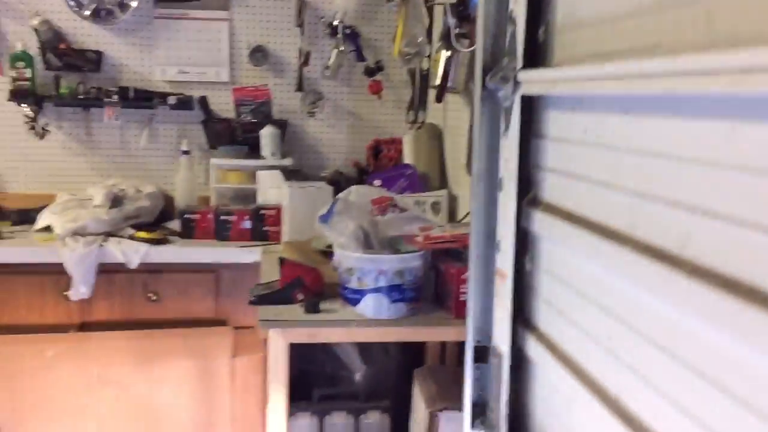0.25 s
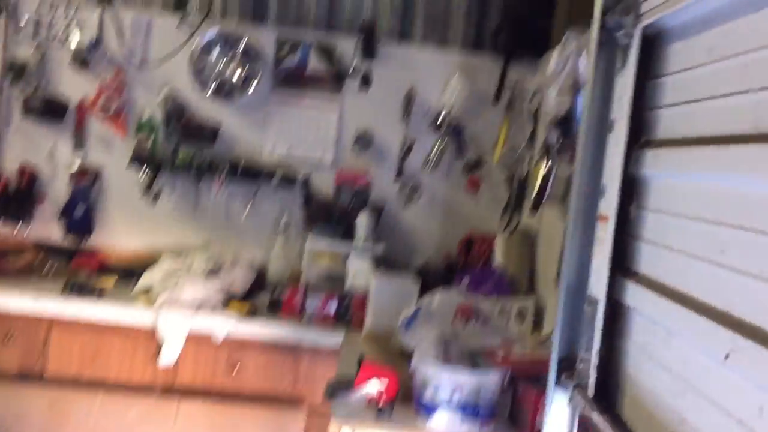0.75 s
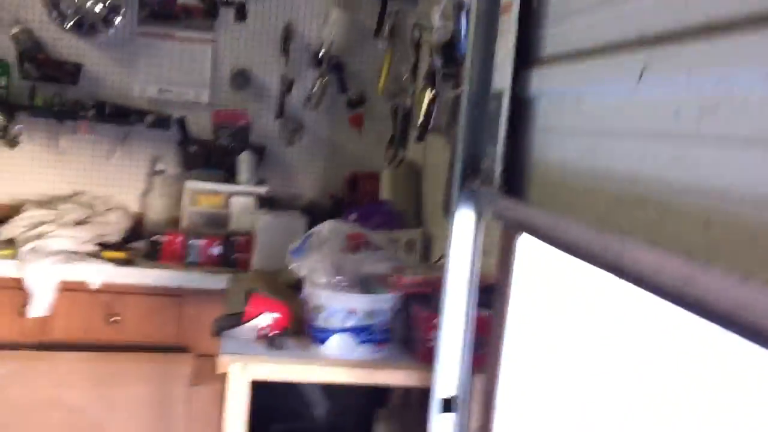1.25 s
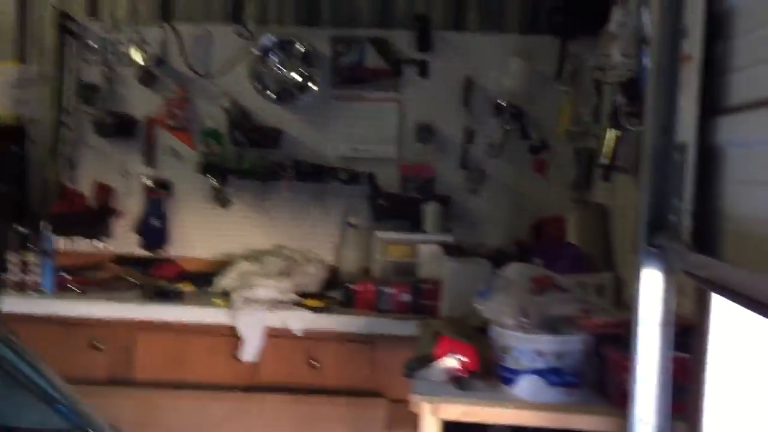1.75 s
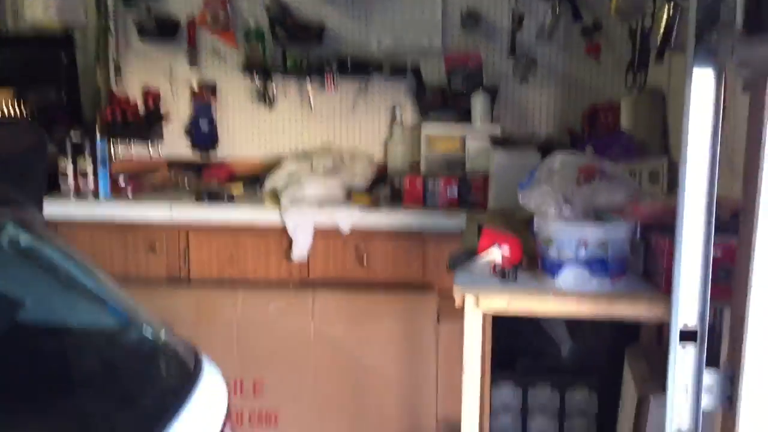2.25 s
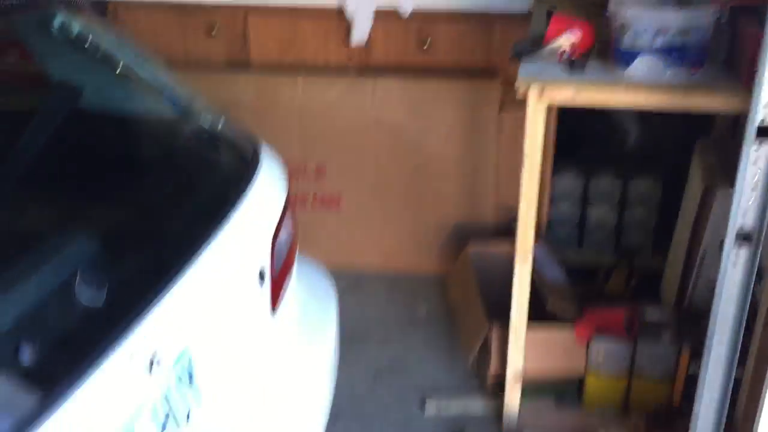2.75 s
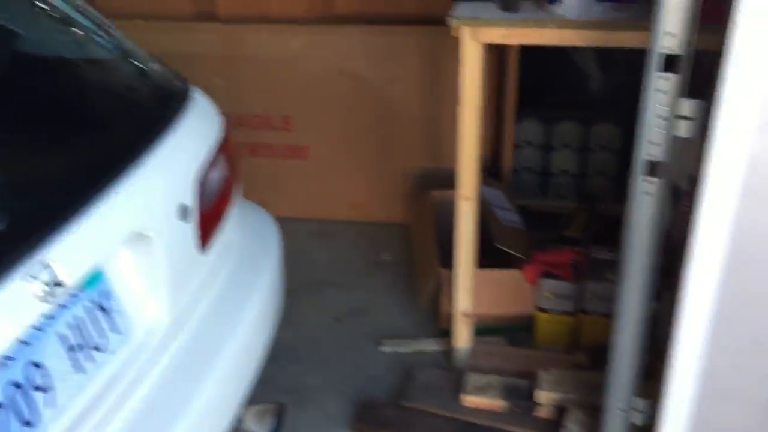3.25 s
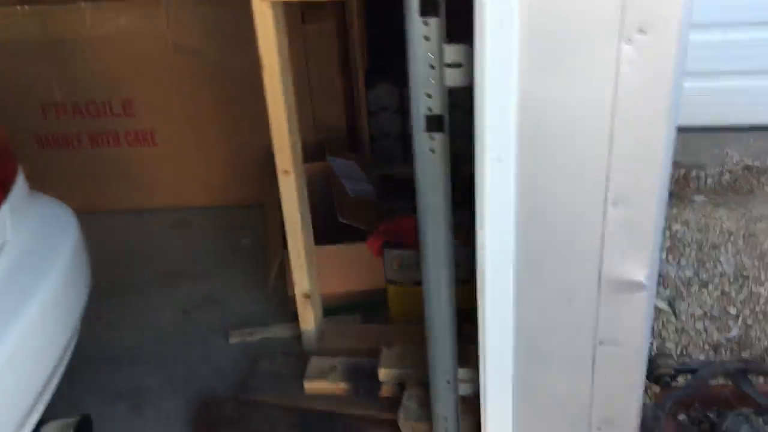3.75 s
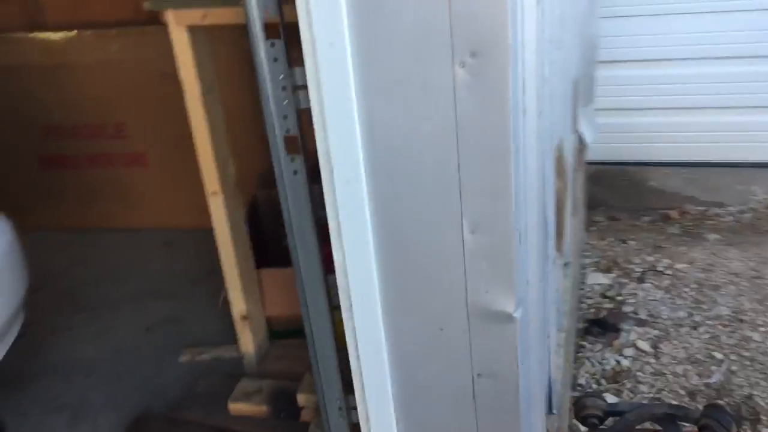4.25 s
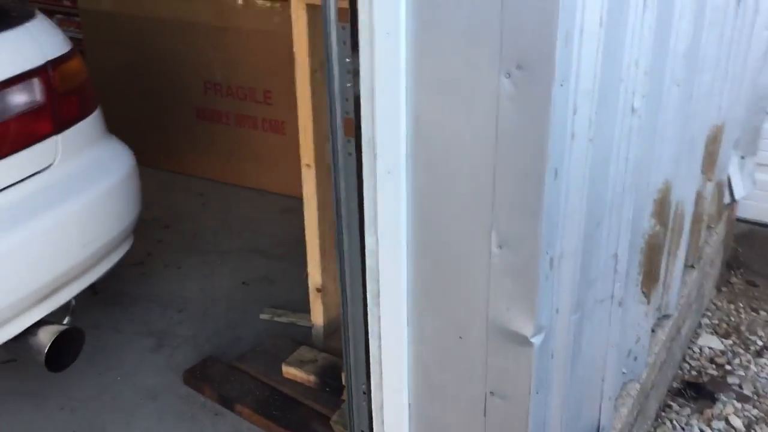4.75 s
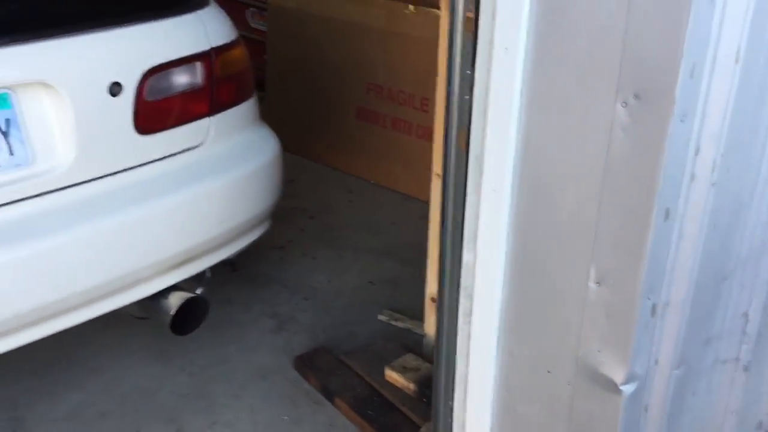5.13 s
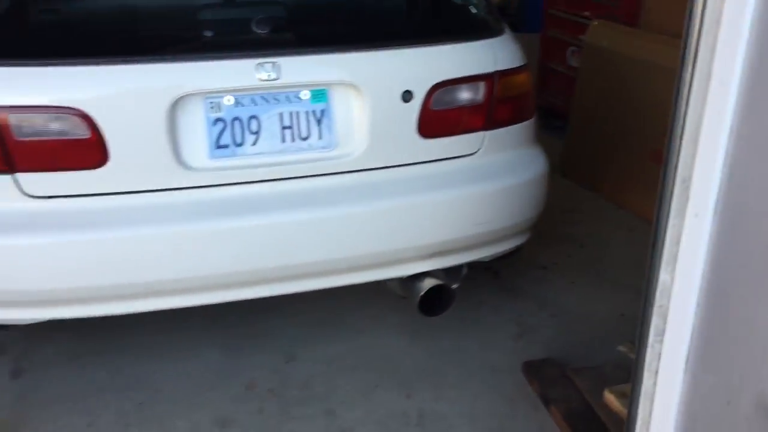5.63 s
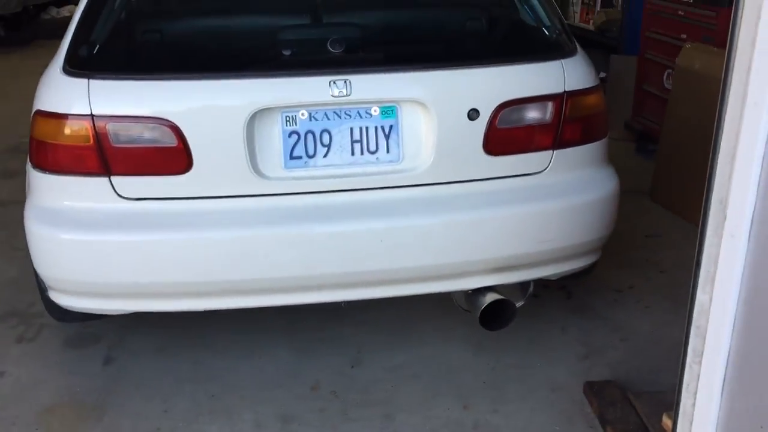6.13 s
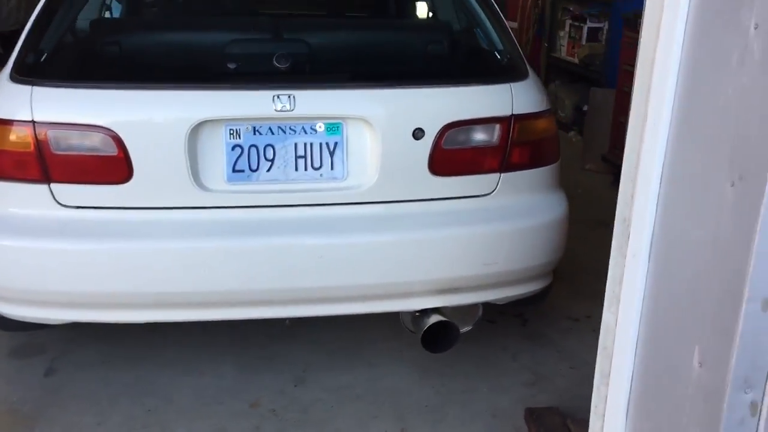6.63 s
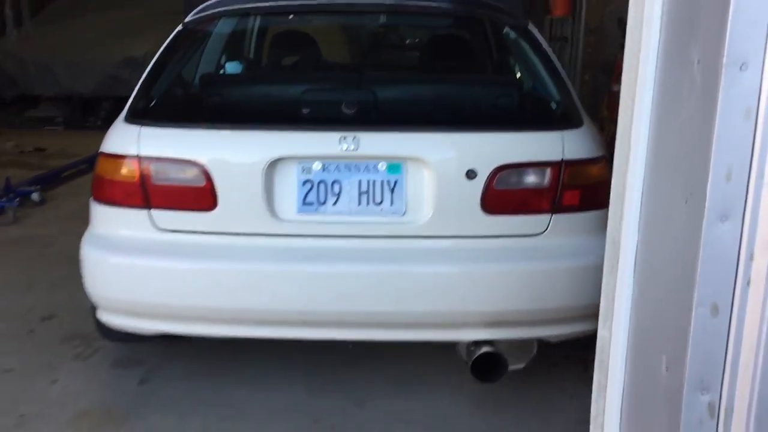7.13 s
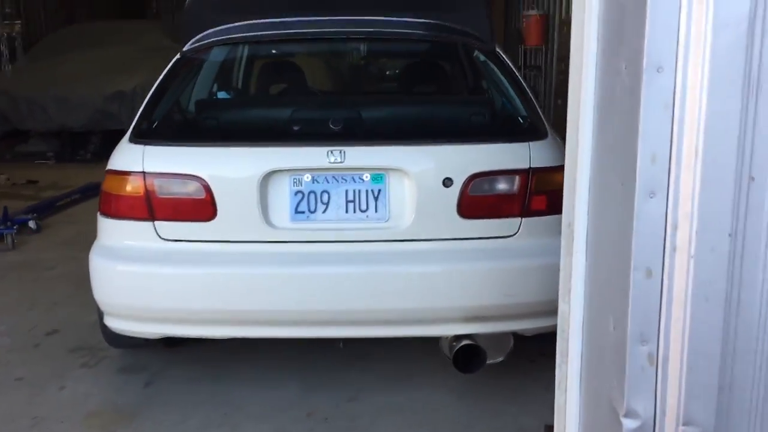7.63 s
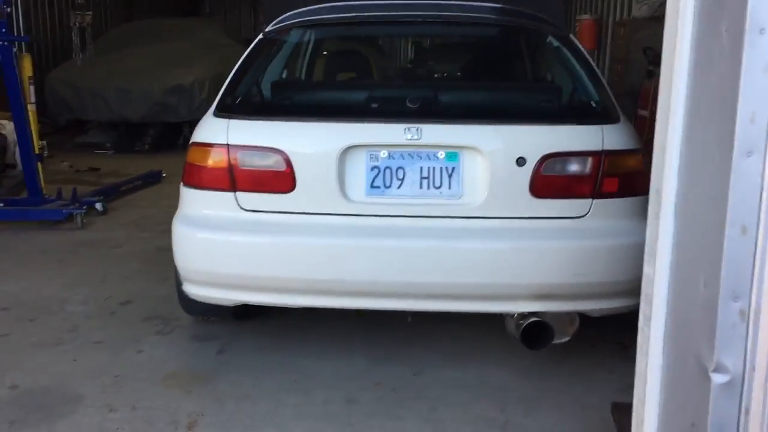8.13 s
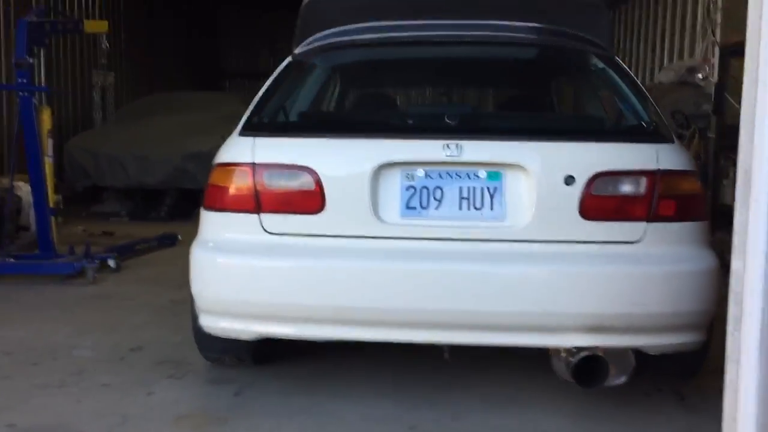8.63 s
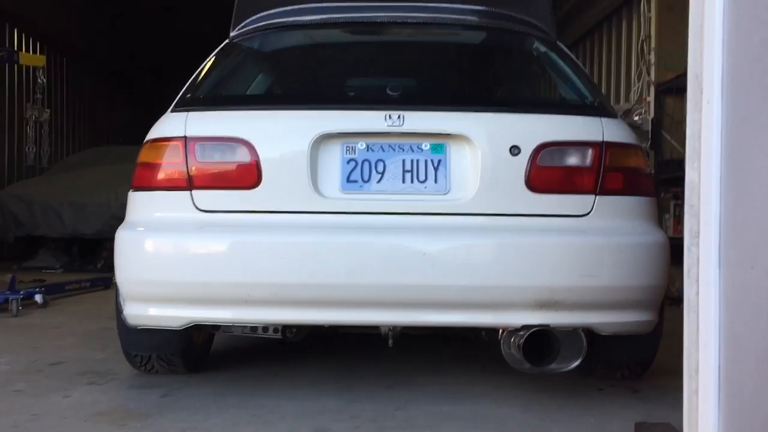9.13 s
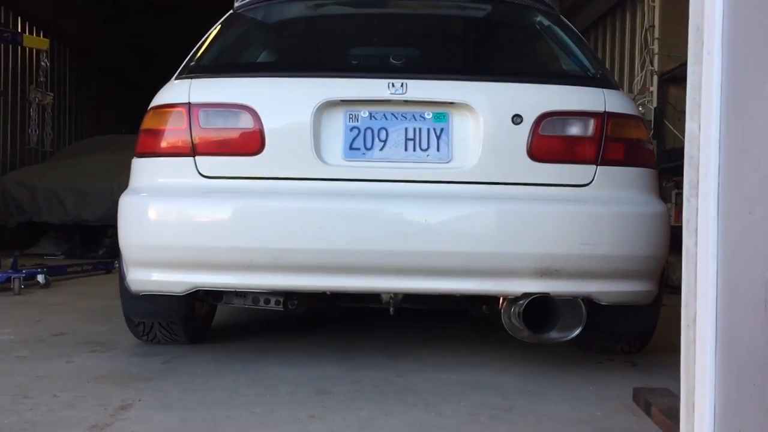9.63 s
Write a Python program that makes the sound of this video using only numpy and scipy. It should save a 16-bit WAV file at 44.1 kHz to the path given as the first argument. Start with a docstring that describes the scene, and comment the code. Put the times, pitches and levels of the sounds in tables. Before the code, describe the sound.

Heard close on a phone, a ribbed sheet-metal garage door is already rolling at 0 s, a loud grainy rush of rollers in tracks with sheet boom and hinge clanks. Dry axles squeak at 0.5-0.9 s. The rush swells again near 0.8 s and slackens by 1.4 s, while heavier clanks continue to 1.8 s. In the lull, small metal parts ping around 2.05 s. A second heave surges from 2.2 s, loudest near 3 s with a high squeak, then slows to a stop around 4.1 s with a lower, rough squeak and short ring. Thin ticks and a weak rattle die by 5 s. Then it is quiet: stones crack sharply at 5.5 s, soles scuff grit intermittently until 8.8 s, most clearly near 6.9 s. A faint bird whistles at 6.2 and 6.5 s. A low rumble, probably distant traffic, swells and fades over faint still air until nearly 10 s.

```python
"""Close to a phone, a ribbed sheet-metal garage door is pushed up in two heaves, 0-1.4 s and 2.2-4.1 s.
Rollers rush in the tracks as shaped noise, panels clank as noise bursts and dry axles squeak as jittered harmonics;
a few parts ping, thin ticks follow as the rush dies away, and the sheet booms as noise through low modes.
After about 5 s a low rumble from the same modes, probably distant traffic, swells and fades, while feet scuff
over grit, filtered clicks with cracking stones; at 6.2-6.6 s a bird whistles outside. Faint still air lies under all."""
import sys
import numpy as np
from scipy import signal
from scipy.fft import rfft, irfft
from scipy.io import wavfile
from scipy.ndimage import uniform_filter1d

SR = 44100
rng = np.random.default_rng(int(sys.argv[2]) if len(sys.argv) > 2 else 0)


def digitize_waveform(pressure):
    """Quantize a signal to 16-bit integers and store it at the path in sys.argv[1].

    Rows of a 2-D input are taken as channels; values are limited to [-1, 1].
    """
    field = np.atleast_2d(pressure).T
    bounded = np.clip(field, -1, 1)
    quanta = np.round(bounded * 32767).astype(np.int16)
    wavfile.write(sys.argv[1], SR, quanta)


N = 435708
T = np.arange(N) / SR  # seconds
F = np.maximum(np.fft.rfftfreq(N, 1 / SR), 1)  # Hz, kept above zero

# Rush of the rollers in the tracks. Each row: time in seconds, level in dB.
ROLLER_RUSH = [(0.0, -22), (0.34, -29.5), (0.53, -25.5), (0.77, -20.5), (1.03, -24.5), (1.39, -34.5),
               (1.87, -39.5), (2.2, -34.5), (2.29, -24), (2.55, -20.5), (2.78, -21), (3.05, -19),
               (3.2, -21.5), (3.58, -23.5), (3.97, -31), (4.18, -43), (4.6, -42), (4.82, -41),
               (5.09, -55.5), (5.3, -75)]
# Colour of the rolling noise, relative only. Each row: frequency in Hz, density in dB per Hz.
TRACK_COLOUR = [(240, -28), (400, -2.5), (520, -3), (729, -1), (2050, -8), (2450, -14), (4300, -19),
                (5000, -25.5), (8600, -28), (10400, -32), (11300, -31.5), (15800, -36.5)]
# The rails ring along. Each row: frequency in Hz, mean gain in dB on the hail in that narrow band.
RAIL_MODES = [(712, -9), (975, -5), (8500, -9)]
# Lower edges of the rush, rattle and sizzle bands, in Hz.
ROLL_EDGES_HZ = 400, 1600, 5000
# Rush, rattle and sizzle. Each row: level over the rush at full run in dB (before the bursts add to it),
# dB gained per dB of rush, looseness as the share of bursts.
ROLL_BANDS = [(2, 1., 0.044), (-1.5, 1.4, 0.12), (-19, 1.5, 0.65)]
# Sizzle above or below what the rush gives. Each row: time in seconds, offset in dB (70 % of it is applied).
SIZZLE_OFFSET = [(0.0, 5), (.6, 6), (1.4, -3.5), (1.93, -2), (2.03, -20), (2.08, -2.5), (3, 3), (3.7, 11),
                 (4.3, 1), (4.55, -5), (4.85, -12), (5.3, -1)]
# The rattle gains as the door slows to a stop. Each row: time in seconds, gain in dB.
RATTLE_GAIN = [(0.0, 0), (4.35, 0), (4.75, 4), (5.3, 2)]
# Low boom of the sheet; after about 5 s a low rumble, probably distant traffic, swells and fades.
# Each row: time in seconds, then deepest, main, upper and top mode groups in dB.
LOW_BOOM = [(0.0, -31.5, -25, -32.5, -54), (1.1, -33, -27.5, -29.5, -46), (2, -40, -39, -66, -48.5),
            (4.1, -38, -31.5, -38, -50), (4.7, -43, -39, -70, -57), (5.34, -47, -34.5, -52, -69),
            (6.44, -48, -38.5, -41.5, -53.5), (7.7, -46, -39, -48, -50), (8.1, -41, -41, -53, -65),
            (8.94, -38, -39.5, -60, -78), (9.4, -51.5, -44, -64.5, -75), (9.88, -50, -45, -65, -74.5)]
# Low modes of the boom and rumble. Each row: frequency in Hz, width in Hz (before the skirts are steepened),
# relative level in dB.
LOW_MODES = [(50.3, 19, -10), (63.2, 2.4, -1.5), (76.1, 1.6, -2.5), (93.1, 34, -7.5), (143.6, 12, -2),
             (168.1, 8.7, 3.5), (183, 20, -1.5), (208.2, 23, 0), (256.7, 26, 1), (294.2, 22, -2.5),
             (332.3, 55, -6), (372.2, 44, -0.5)]
# Edges of the five groups of low modes, in Hz.
BOOM_EDGES_HZ = 43, 90, 120, 235, 320, 420
# The five groups shaken by the rollers. Each row: level at full run in dB, dB gained per dB of rush.
SHAKEN_GROUPS = [(-37.5, 3), (-25, 1), (-25, 0.64), (-24.5, 0.68), (-27.5, 0.86)]
# Panels clank at the hinges. Each row: start in seconds, level in dB (before a common cut),
# weight in dB: a heavy clank has more body and less treble.
CLANKS = [(0.0187, -14.5, -1), (0.2575, -19, 4), (0.416, -21, 5), (0.8925, -26, -6), (1.0089, -17, -0.5),
          (1.1288, -21.5, 0.5), (1.175, -19, 0), (1.2182, -20.5, 1.5), (1.2666, -21.5, 6),
          (1.3167, -24.5, -3), (1.4534, -25.5, 6), (1.574, -19, 3.5), (1.7627, -16, 1.5), (1.8157, -35, 19),
          (1.8944, -38, -3), (1.9843, -32.5, 14), (2.0354, -28, 7.5), (2.0852, -25.5, -9),
          (2.1084, -31.5, -13), (2.262, -28, 9), (2.3233, -20.5, 4.5), (2.4192, -19.5, -9),
          (2.945, -19, -8.5), (3.4087, -20, -12.5), (3.8699, -21.5, -5.5), (3.961, -23.5, -3.5),
          (4.0931, -26, -2), (4.4037, -42, 14)]
# Middle, body and treble of a clank. Each row: low edge in Hz, high edge in Hz, 60 dB decay in seconds.
CLANK_BANDS = [(2410, 6040, 0.071), (730, 2340, 0.11), (7040, 15500, 0.088)]
# Stick-slip squeaks. Each row: start in seconds, length in seconds, pitch in Hz,
# share of pitch moved per unit of jitter, level in dB, octave in dB against the fundamental.
SQUEAKS = [(0.53, 0.12, 2600, 0.012, -24.5, -12), (0.63, 0.13, 2670, 0.007, -19, -15),
           (0.58, 0.16, 3850, 0.03, -30.5, -18), (0.691, 0.2, 3320, 0.025, -21, -12.5),
           (3.026, 0.11, 4370, 0.024, -19.5, -9), (3.43, 0.09, 6680, 0.012, -35, -12),
           (4.088, 0.067, 1759, 0.017, -15.5, -12.5), (4.118, 0.13, 2203, 0.005, -25, -28),
           (4.122, 0.04, 2650, 0.03, -35, -20.5), (4.15, 0.1, 6640, .003, -50, -32)]
# Small metal parts ping. Each row: start in seconds, level in dB before decay, pitch in Hz.
PINGS = [(2.037, -21.5, 1400), (2.0545, -31, 4200), (2.0844, -21, 4470), (2.1095, -19.5, 3950)]
# Thin ticks. Each row: start in seconds, level in dB before decay, frequency in Hz that places the band.
TICKS = [(4.28, -60, 13000), (4.313, -55, 12000), (4.5196, -54, 11000), (4.68, -62, 10860),
         (4.89, -59, 12000), (4.9866, -61, 11000), (6.6293, -64, 12130), (6.877, -52, 3300),
         (7.0419, -59.5, 9620), (8.098, -59, 3600), (8.194, -62, 3300)]
# Soles drag over grit. Each row: start in seconds, length in seconds, level in dB, frequency in Hz that scales the bands.
SCUFFS = [(5.504, 0.1, -60, 1700), (5.575, .19, -54, 1720), (6.37, 0.17, -58, 1160),
          (6.875, 0.16, -51.5, 1540), (7.118, 0.07, -56.5, 2850), (7.444, 0.091, -63.5, 2050),
          (7.672, 0.066, -59.5, 2800), (7.756, 0.087, -56.5, 2400), (7.86, 0.072, -58.5, 1800),
          (8.62, 0.062, -66, 1990), (8.715, 0.13, -63, 1400)]
# Faint shuffling between the steps. Each row: time in seconds, level in dB.
SHUFFLE = [(4.9, -65), (6.1, -62), (6.7, -57), (7.9, -66), (8.4, -78)]
# Single stones crack under a sole. Each row: start in seconds, level in dB before decay, pitch in Hz.
STONES = [(5.281, -42, 1080), (5.459, -39, 1800), (5.4788, -24.5, 1650), (5.4932, -23, 1850),
          (5.55, -28, 1700), (5.5972, -33, 2360), (5.684, -30, 2300), (5.7194, -34, 2000),
          (5.813, -35, 1460), (6.3807, -40, 1185), (6.779, -29.5, 1710), (6.922, -38, 1800),
          (7.043, -44, 3400), (7.7917, -31, 2280), (8.1, -43, 1950), (8.775, -40, 1148)]
# A bird outside. Each row: start in seconds, length in seconds, start pitch in Hz, end pitch in Hz, level in dB
# (pitch and level before flutter).
CHIRPS = [(6.179, 0.071, 5330, 5300, -57), (6.517, .045, 4950, 5190, -57.5), (6.565, .07, 5150, 4950, -67)]
# Colour of the still air, relative only. Each row: frequency in Hz, density in dB per Hz.
AIR_COLOUR = [(240, -28.5), (400, -1), (787, -11), (1700, -13), (2910, -17), (6180, -23), (15800, -30)]

AIR_DB = -66.5
FULL_RUN_DB = -20  # rush of the door at full run
CLANK_CUT_DB, CLANK_TREBLE_DB, TREBLE_PER_WEIGHT = -7.5, -12, -1  # last one: dB of treble per dB of weight
SQUEAK_FALL_DB = -6  # each harmonic above the octave
SCUFF_TREBLE_DB = -20  # against the rest of the drag
ROOM_T60_S, ROOM_TREBLE_T60_S, ROOM_DB = 0.56, 0.29, -3
TOP_HZ = 15830  # top of the phone's range


def undb(db):
    """Decibels to gain."""
    return 10 ** (np.asarray(db) / 20)


def unit(x):
    """Scale to rms 1."""
    return x / np.sqrt(np.mean(x ** 2))


def columns(table):
    """Turn time and dB rows into one gain track per column, at -120 dB outside the table."""
    s, *cols = np.transpose(table)
    return [undb(np.interp(T, s, c, left=-120, right=-120)) for c in cols]


def colour(x, points):
    """Shape a spectrum by Hz and dB points, straight lines over log frequency."""
    hz, db = np.transpose(points)
    gain = undb(np.interp(np.log(F), np.log(hz), db))
    return irfft(rfft(x) * gain, N)


def band(x, lo_hz, hi_hz, order=2):
    """Causal band-pass, its upper edge held to 0.45 of the sample rate at most."""
    sos = signal.butter(order, [lo_hz, min(hi_hz, .45 * SR)], "band", fs=SR, output="sos")
    return signal.sosfilt(sos, x)


def walk(rate):
    """Random levels of rms 1, held 1 / rate seconds and slewed twice."""
    k = int(SR / rate)
    held = rng.standard_normal(N // 64)[np.arange(N) // k]
    return unit(uniform_filter1d(uniform_filter1d(held, k), k))


def grains(rate, spread_db):
    """Random clicks of very unequal size, rate per second on average, scaled to rms 1."""
    hit, size, sign = rng.random((3, N))
    loudness = undb(spread_db * np.minimum(-np.log(1 - size), 4.5))
    return unit((hit < rate / SR) * loudness * np.sign(sign - .5))


def add(out, s, x):
    """Mix x in at s seconds."""
    i = int(s * SR)
    out[i:i + len(x)] += x[:N - i]


def room(x):
    """The hard-walled garage answers with a diffuse noise tail; its treble fades first."""
    t = T[:SR]
    noise = rng.standard_normal(SR)
    low = signal.sosfilt(signal.butter(1, 5500, fs=SR, output="sos"), noise)
    tail = low * undb(-60 * t / ROOM_T60_S) + (noise - low) * undb(-60 * t / ROOM_TREBLE_T60_S)
    tail = tail * np.minimum(t / 0.0087, 1)
    return x + undb(ROOM_DB) * signal.fftconvolve(x, tail / np.sqrt(np.sum(tail ** 2)))[:N]


def follow(db, slope):
    """A level that rises and falls with the rush of the rollers."""
    return undb(FULL_RUN_DB + db) * (columns(ROLLER_RUSH)[0] / undb(FULL_RUN_DB)) ** slope


def rollers():
    """Rollers chatter over the track in a hail of tiny knocks; loose hardware rattles in bursts, most in the treble."""
    hail = colour(grains(2500, 2.3) + 1.2 * rng.standard_normal(N), TRACK_COLOUR)
    # now one rail mode stands out, now another
    ringing = sum(undb(db + 4 * walk(7)) * band(hail, hz / 1.05, hz * 1.05, order=1) for hz, db in RAIL_MODES)
    hail = hail + ringing
    surge = undb(.4 * walk(14))
    t = T[:SR // 8]
    burst_shape = undb(-60 * t / 0.2) * np.minimum(t / 0.036, 1)
    bursts = signal.fftconvolve(np.abs(grains(22, 2.7)), burst_shape)[:N]
    bursts /= bursts.mean()
    sizzle_gain = columns(SIZZLE_OFFSET)[0] ** .7
    own_gains = [1, columns(RATTLE_GAIN)[0], sizzle_gain]
    edges = [*ROLL_EDGES_HZ, 18000]
    out = np.zeros(N)
    for (db, slope, loose), own, lo, hi in zip(ROLL_BANDS, own_gains, edges, edges[1:]):
        level = follow(db, slope) * own * surge * undb(1.0 * walk(24.92))
        out += level * (1 + loose * bursts) * unit(band(hail, lo, hi, order=3))
    return out


def boom_and_low_rumble():
    """Noise through low modes: the sheet's boom, buried in broad noise while the door runs fast, then a low rumble."""
    modes = 0
    for hz, width, db in LOW_MODES:
        resonance = 1 + 1j * (F / hz - hz / F) * hz / width
        shaking = rfft(rng.standard_normal(N)) / np.sqrt(width)
        modes = modes + undb(db) * shaking / resonance ** 1.57  # the power steepens the skirts
    ring, broad = irfft(modes, N), rng.standard_normal(N)
    running = np.clip(columns(ROLLER_RUSH)[0] / undb(-27.0), 0, .8)  # share of broad noise in power
    deep, main, upper, top = columns(LOW_BOOM)
    out = np.zeros(N)
    groups = zip((deep, main, main, upper, top), SHAKEN_GROUPS, BOOM_EDGES_HZ, BOOM_EDGES_HZ[1:])
    for own, (db, slope), lo, hi in groups:
        gain = np.hypot(own, follow(db - FULL_RUN_DB, slope))
        ring_part = np.sqrt(1 - running) * unit(band(ring, lo, hi, order=3))
        broad_part = np.sqrt(running) * unit(band(broad, lo, hi, order=3))
        out += gain * (ring_part + broad_part)
    return out


def clanks():
    """Each clank is a short burst of rattling metal in three noise bands, of which the body lasts longest."""
    out, t = np.zeros(N), T[:SR // 4]
    for s, db, weight_db in CLANKS:
        band_levels_db = (0, weight_db, CLANK_TREBLE_DB + TREBLE_PER_WEIGHT * weight_db)
        for (lo, hi, t60), own_db in zip(CLANK_BANDS, band_levels_db):
            burst = unit(band(rng.standard_normal(len(t)), lo, hi, order=3))
            envelope = np.minimum(t / 0.0025, 1) * undb(-60 * t / t60)
            add(out, s, undb(db + own_db + CLANK_CUT_DB) * burst * envelope)
    return out


def squeaks():
    """A dry axle slips in an unsteady cycle: a rough stack of harmonics that stutters and rings on in the rails."""
    out = np.zeros(N)
    jitter = .25 * walk(25) + .5 * walk(200) + walk(600)
    stutter = undb(2.8 * walk(50) + 3.2 * walk(350))
    for s, length, hz, rough, db, octave_db in SQUEAKS:
        i, n = int(s * SR), int(length * SR)
        u = np.arange(n) / n
        phase = 2 * np.pi * np.cumsum(hz * (1 + rough * jitter[i:i + n])) / SR
        tone = np.sin(phase)
        for k in range(7):
            if (k + 2) * hz < TOP_HZ:
                tone = tone + undb(octave_db + k * SQUEAK_FALL_DB) * np.sin((k + 2) * phase)
        edge = np.minimum(1, u / 0.1) * (1 - u) ** 0.51
        add(out, s, undb(db) * unit(stutter[i:i + n]) * edge * tone)
    rails = band(rng.standard_normal(SR), 300, 4600, order=1) * undb(-60 * T[:SR] / 0.72)
    return out + undb(-8.0) * signal.fftconvolve(out, rails / np.sqrt(np.sum(rails ** 2)))[:N]


def pings():
    """Each ping is a short decaying sine on one pitch, close and dry."""
    out, t = np.zeros(N), T[:SR // 20]
    for s, db, hz in PINGS:
        add(out, s, undb(db - 60 * t / .022) * np.minimum(t / 0.00083, 1) * np.sin(2 * np.pi * hz * t))
    return out


def ticks():
    """Each tick is a noise band that falls 60 dB in 36 ms."""
    out, t = np.zeros(N), T[:SR // 20]
    for s, db, hz in TICKS:
        noise = unit(band(rng.standard_normal(len(t)), hz / 1.8, hz * 1.26))
        add(out, s, undb(db) * noise * undb(-60 * t / 0.036))
    return out


def crunch(grit, lumps, hz):
    """Grit of four sizes, each in its own narrow band and in its own uneven lumps."""
    layers = 0
    for k, size in enumerate((.5, .72, 1.02, 1.4)):
        shifted = np.roll(grit, k * 777)  # so the sizes do not click together
        layers = layers + lumps[k] * unit(band(shifted, hz * size / 1.2, hz * size * 1.2))
    return unit(layers)


def feet():
    """Soles drag over grit, and single stones crack with a ring of a few cycles."""
    grit = grains(600, 3.2)
    grit = grit + .5 * room(grit)
    lumps = np.array([undb(4.5 * walk(90)) for _ in range(4)])
    drift = np.array([undb(3.5 * walk(25)) for _ in range(4)])
    out = columns(SHUFFLE)[0] * crunch(grit, drift, 1050)
    bright = unit(band(grit, 3500, 16000))
    for s, length, db, hz in SCUFFS:
        i, n = int(s * SR), int(length * SR)
        drag = crunch(grit[i:i + n], lumps[:, i:i + n], hz) + undb(SCUFF_TREBLE_DB) * bright[i:i + n]
        add(out, s, undb(db) * drag * np.sin(np.pi * (np.arange(n) / n) ** 0.85) ** 0.42)
    crack, t = np.zeros(N), T[:SR // 20]
    for s, db, hz in STONES:
        envelope = np.minimum(t * hz, 1) * np.exp(-t * hz / 1.86)  # rises in one cycle
        add(crack, s, undb(db) * np.sin(2 * np.pi * hz * t) * envelope)
    return out + crack + undb(-6) * (room(crack) - crack)


def bird():
    """Short gliding whistles that flutter in pitch and level, with a faint echo."""
    out, flutter = np.zeros(N), walk(160)
    for s, length, from_hz, to_hz, db in CHIRPS:
        i, n = int(s * SR), int(length * SR)
        u = np.arange(n) / n
        hz = (from_hz + (to_hz - from_hz) * u) * (1 + 0.0077 * flutter[i:i + n])
        level = undb(db + 2.2 * flutter[i - n:i]) * np.sin(np.pi * u) ** 0.76
        add(out, s, level * np.sin(2 * np.pi * np.cumsum(hz) / SR))
    return out + undb(-5.5) * (room(out) - out)


def still_air():
    """Steady noise, strongest in the lower mids and falling towards the treble."""
    return undb(AIR_DB) * unit(colour(rng.standard_normal(N), AIR_COLOUR))


def scene():
    """Door and low rumble, then feet, the bird outside and the still air."""
    air = still_air()
    door_and_rumble = rollers() + boom_and_low_rumble() + room(clanks() + ticks()) + pings() + squeaks()
    return (door_and_rumble + feet() + bird() + air)[None]


def record(dry):
    """The phone's microphone path cuts the top steeply."""
    return signal.sosfilt(signal.ellip(10, .2, 70, TOP_HZ, fs=SR, output="sos"), dry)


dry = scene()
out = record(dry)
digitize_waveform(out)
```